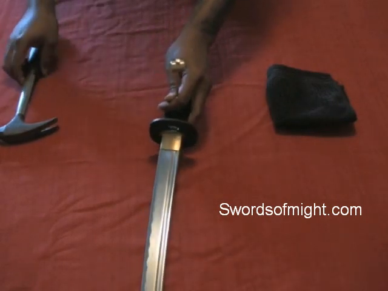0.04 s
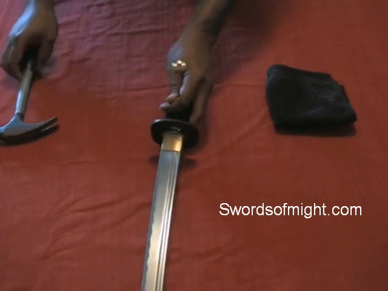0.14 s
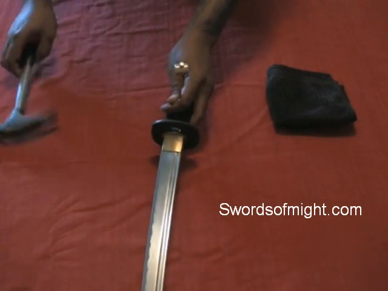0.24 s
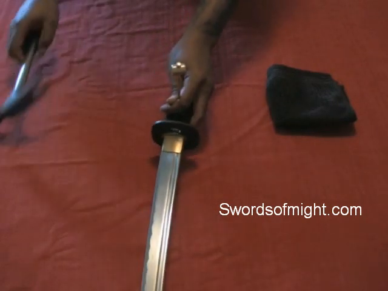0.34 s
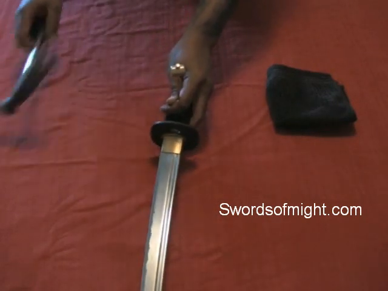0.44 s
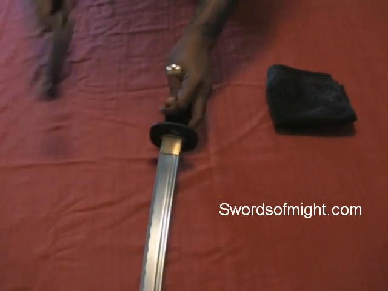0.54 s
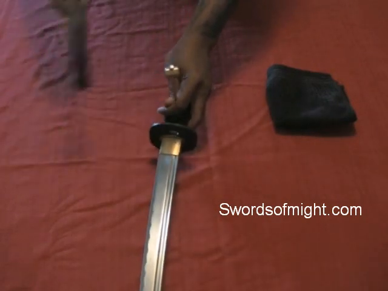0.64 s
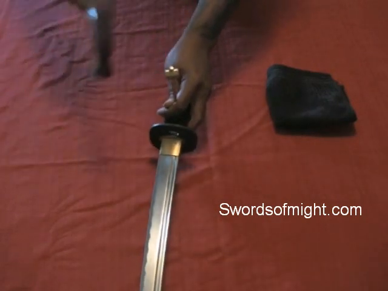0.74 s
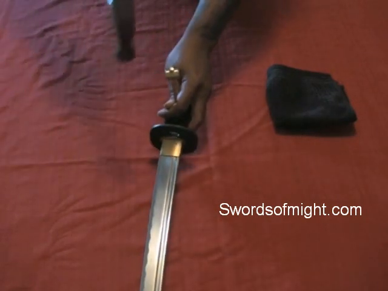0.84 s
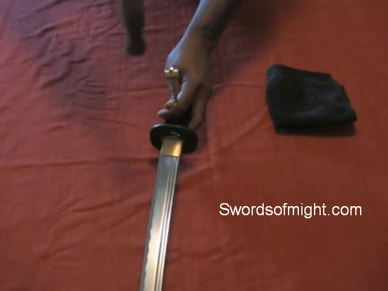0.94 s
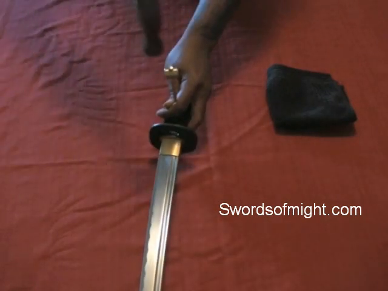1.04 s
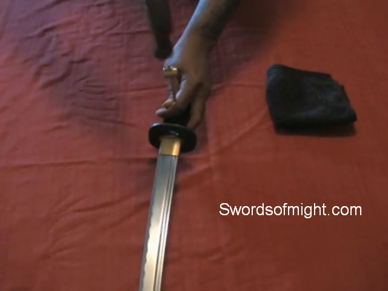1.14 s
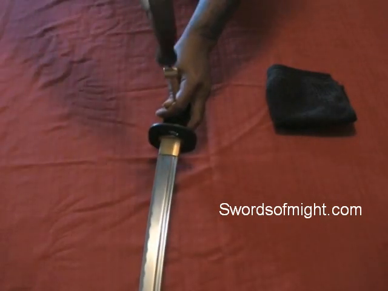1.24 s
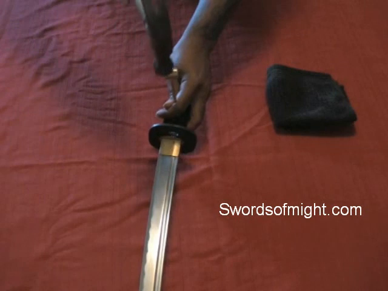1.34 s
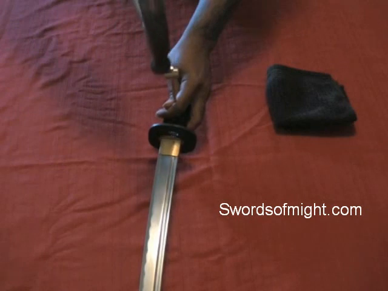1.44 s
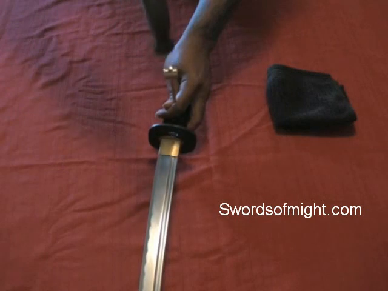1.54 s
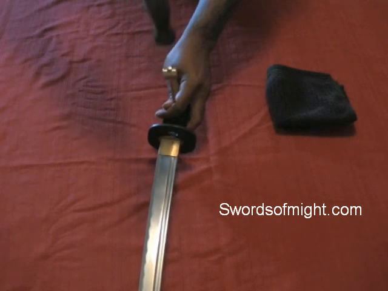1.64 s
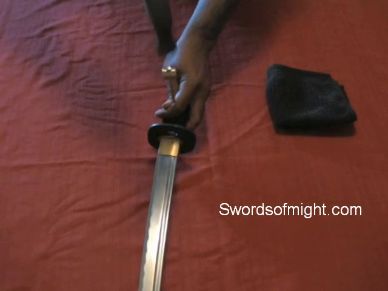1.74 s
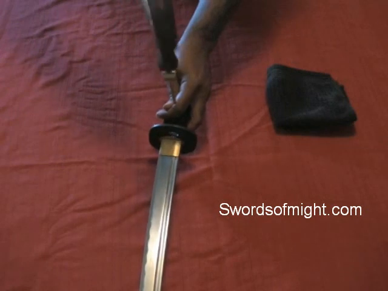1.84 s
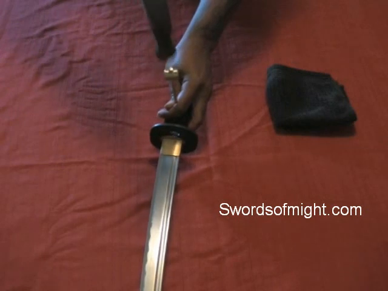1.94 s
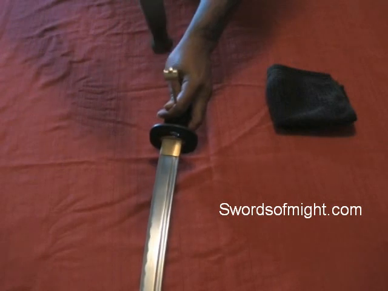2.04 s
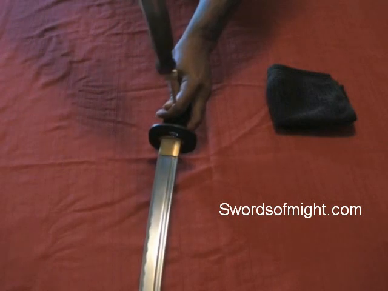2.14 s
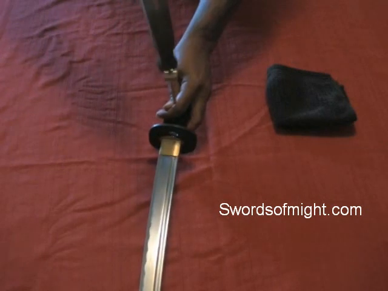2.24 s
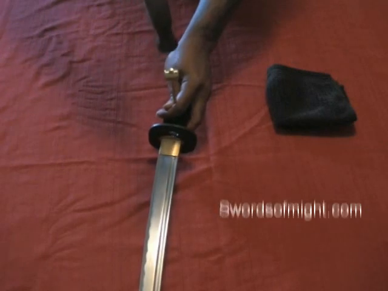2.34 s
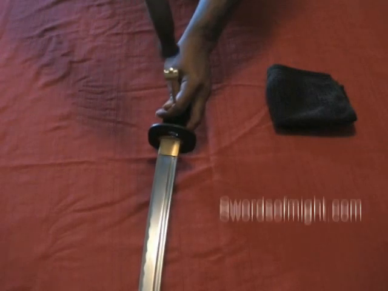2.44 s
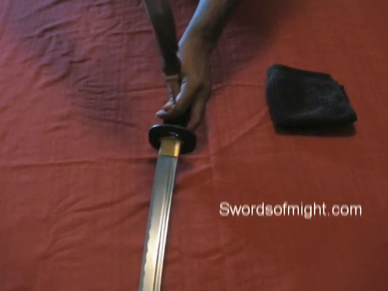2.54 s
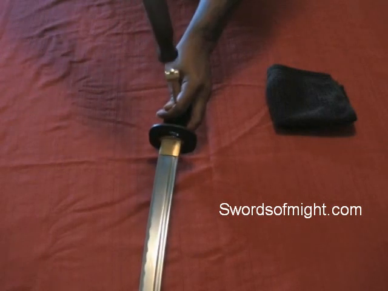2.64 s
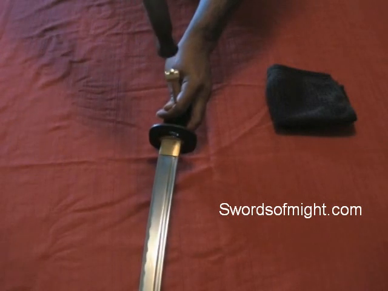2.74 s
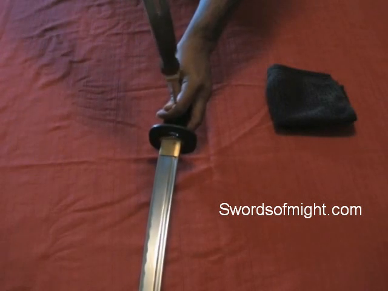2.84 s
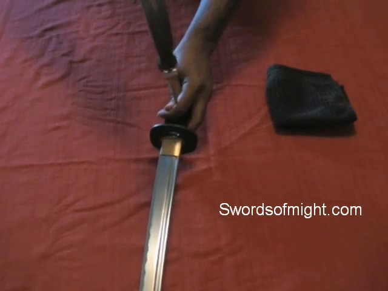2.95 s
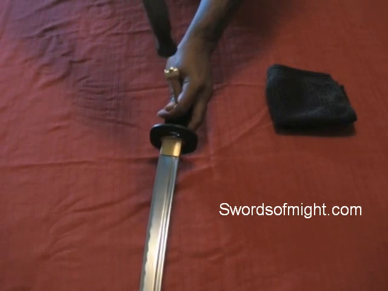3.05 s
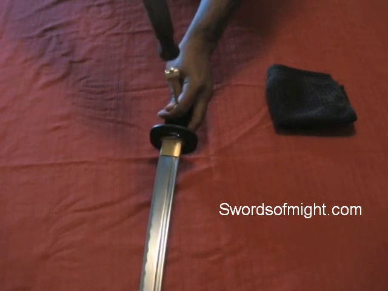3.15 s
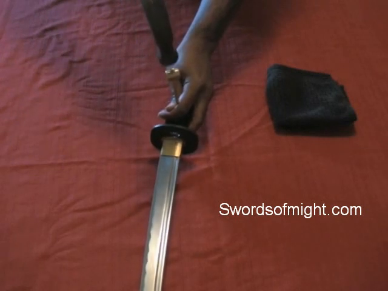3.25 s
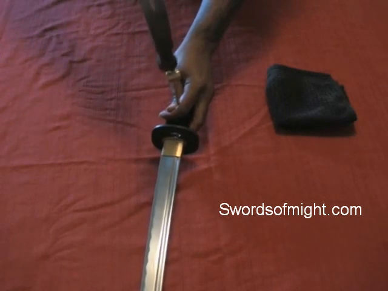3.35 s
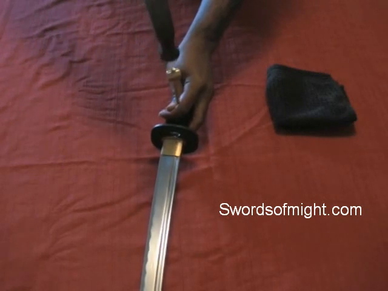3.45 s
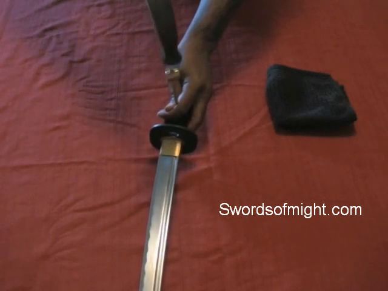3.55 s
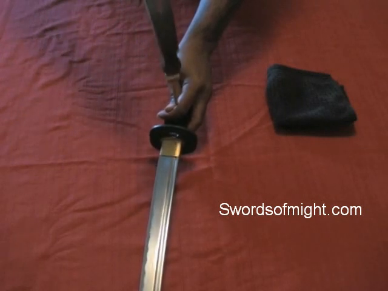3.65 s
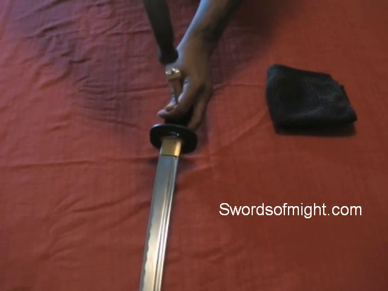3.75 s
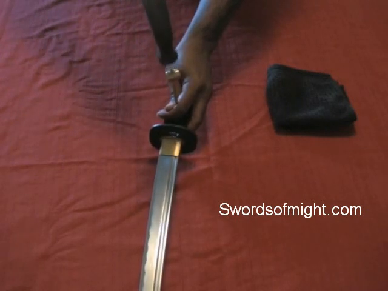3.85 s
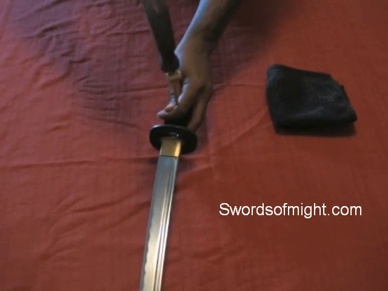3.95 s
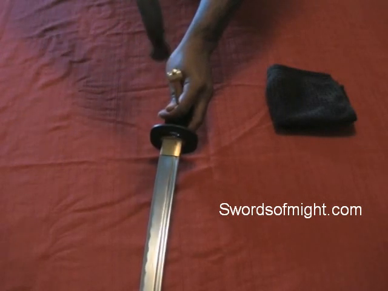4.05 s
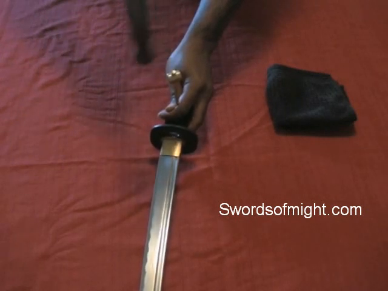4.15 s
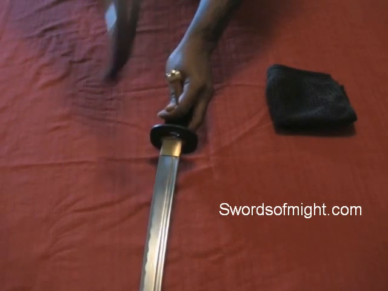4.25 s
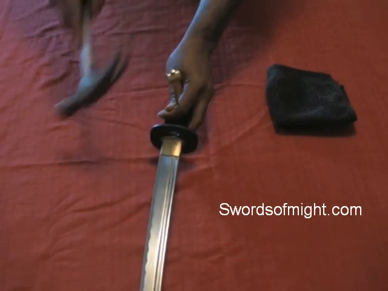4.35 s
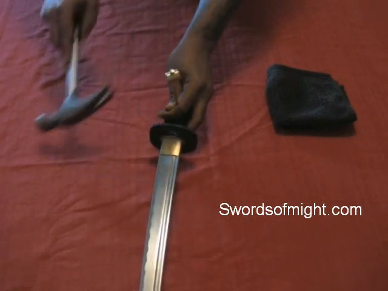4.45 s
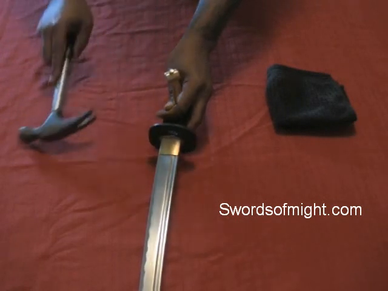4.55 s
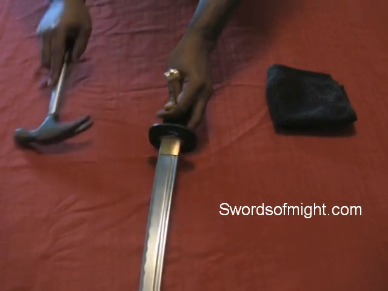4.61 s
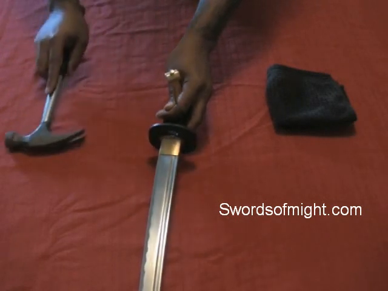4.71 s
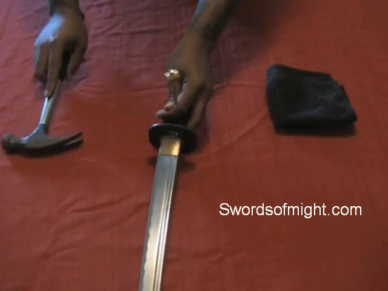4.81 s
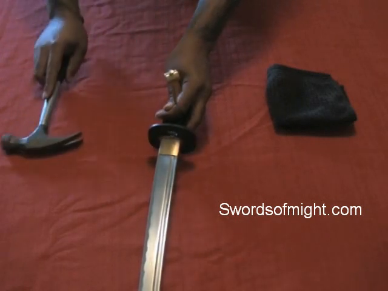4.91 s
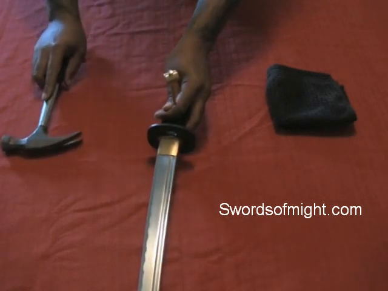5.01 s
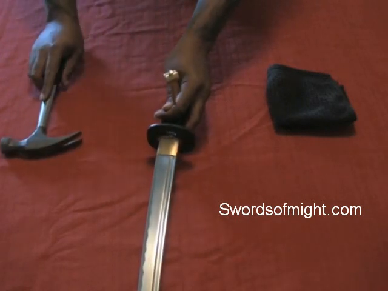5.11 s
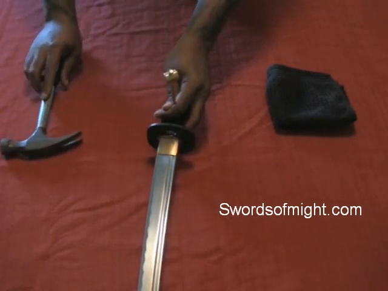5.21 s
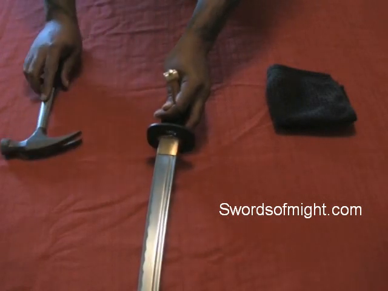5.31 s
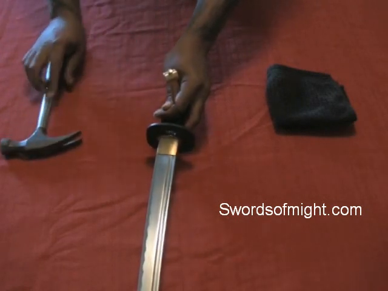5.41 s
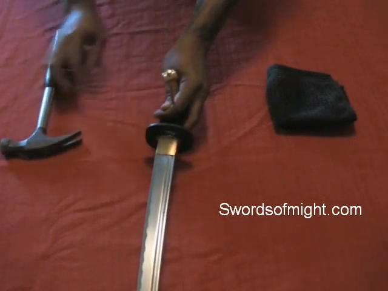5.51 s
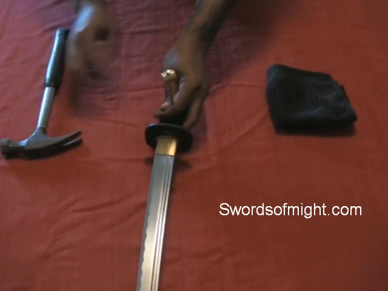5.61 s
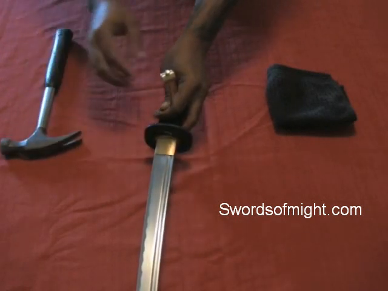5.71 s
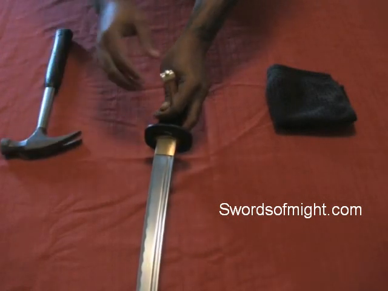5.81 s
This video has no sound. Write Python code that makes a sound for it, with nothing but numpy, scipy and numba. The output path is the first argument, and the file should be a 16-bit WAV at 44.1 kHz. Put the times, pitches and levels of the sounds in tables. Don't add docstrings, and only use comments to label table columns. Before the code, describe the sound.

Faint clink, then a run of hard, bright hammer cracks with woody table thumps and room echo, ending in soft padded thuds over hiss.

```python
import sys
import numpy as np
from scipy import signal
from scipy.fft import rfft, irfft
from scipy.io import wavfile
from scipy.ndimage import uniform_filter1d
from numba import njit

SR = 44100
rng = np.random.default_rng(int(sys.argv[2]) if len(sys.argv) > 2 else 0)


def wrap_up_sound(samples):
    columns = np.atleast_2d(samples).T
    tamed = np.clip(columns, -1, 1)
    steps = np.round(tamed * 32767).astype(np.int16)
    wavfile.write(sys.argv[1], SR, steps)


def gain_from_db(level_db):
    decades = np.asarray(level_db, float) / 20
    return 10 ** decades


N = 259040
TIME = np.arange(N) / SR

# [t/s, peak level/dB, tilt/dB per octave, push/ms, detour off the cloth/cm]
BLOWS = [
    (0.271, -21.5, 1.6, 0.12, 3.1),
    (1.3424, -6, .8, .345, 9.3),
    (1.8514, 6, 0.1, .21, 16),
    (2.2099, -1, -2.16, 0.14, 25),
    (2.5618, 0, -0.6, 0.15, 23.6),
    (2.9043, -1, -1.9, 0.14, 15),
    (3.3426, -3, -6.5, 0.13, 39),
    (3.6599, -3, -3.1, 0.13, 20.5),
    (3.9532, -4.5, -0.4, 0.16, 11.9),
]
# [f/Hz, level/dB, t60/s]
BOARD_MODES = [(71, -21, 0.5), (105.5, -28.5, 1), (132.3, -19.5, 0.39), (176.7, -5, 0.22), (200, -12, 0.25),
               (209.5, -16.5, 0.15), (249.9, -2, 0.29), (280.5, -5.5, 0.59), (340, -3, 0.16),
               (374, 5, 0.52), (385.2, 6.5, 0.2), (399, 14.5, 0.12), (445, -6.5, .5), (488, -6, 0.66),
               (535, -14, 0.7), (570, -22, 0.82), (606, 7, 0.42), (630, -16, 1), (686, 3, 0.53),
               (643, 1, 0.3), (743, -2.5, 0.52), (785, -7, 1), (840, -3.5, 0.68), (866, -8.5, 1),
               (941, -5.5, 1), (960, -10, 0.82), (1003, -5, 0.41), (1060, -9, 0.52), (1210, -12, 0.95),
               (1243, -18, 1)]


def unit(x):
    return x / np.max(np.abs(x))


def band(x, lo_hz, hi_hz, order=2):
    return signal.sosfilt(signal.butter(order, [lo_hz, hi_hz], "band", fs=SR, output="sos"), x)


def add(track, start_s, x):
    i = int(start_s * SR)
    track[i:i + len(x)] += x[:N - i]


def modes(mode_table, length_s, phase, extra_db=0, beat=0):
    hz, db, t60_s = np.transpose(mode_table)[:, :, None]
    t = TIME[:int(length_s * SR)]
    rate, start = rng.random((2, 2, len(mode_table), 1))
    spread_hz = 36 * (rate - 0.5)
    neighbours = 1 + beat * np.sum(np.exp(2j * np.pi * (spread_hz * t + start)), axis=0)
    swing = np.imag(neighbours * np.exp(1j * (2 * np.pi * hz * t + phase)))
    return np.sum(gain_from_db(db + extra_db - 60 * t / t60_s) * swing, axis=0)


def camcorder_noise():
    # [f/Hz, level/dB per Hz]
    hiss_spectrum = [(26, -45), (45, -7), (55, -11.5), (88, -17), (225, -3.5), (355, -1), (391, -10.5),
                     (441, -0.5), (485, -6), (973, -8), (1150, -12), (4640, -26), (11800, -34.5),
                     (13000, -32.5), (14000, -81)]
    # [t/s, level/dB]
    hiss_gain = [(0, -46), (1.3, -47), (2.0, -48), (4.2, -47.5), (5.87, -48.5)]
    # [f/Hz, level/dB]
    whine_tones = [(26, -62), (30, -67), (985, -68), (3898, -82), (4194, -79), (4495, -75), (4797, -82),
                   (5394, -81), (5819, -81), (5992, -80), (6293, -82)]
    hz, db = np.transpose(hiss_spectrum)
    f = np.maximum(np.fft.rfftfreq(N, 1 / SR), 1)
    noise = irfft(rfft(rng.standard_normal(N)) * gain_from_db(np.interp(np.log(f), np.log(hz), db)), N)
    noise = noise / np.std(noise) * gain_from_db(np.interp(TIME, *np.transpose(hiss_gain)) - 3.5)
    drift_rad = np.cumsum(rng.standard_normal(N)) * 0.006
    for k, (tone_hz, tone_db) in enumerate(whine_tones):
        phase = k + drift_rad * min(k, 1)
        noise = noise + np.sqrt(2) * gain_from_db(tone_db) * np.sin(2 * np.pi * tone_hz * TIME + phase)
    return noise


def push_db(f, push_ms, fill):
    x = f * push_ms / 1000 + 1e-4
    lobes = np.sinc(x) / (1 - x ** 2)
    return 10 * np.log10(lobes ** 2 + (fill / (1 + np.pi * x ** 3)) ** 2)


def crack_colour(blow_db, tilt_db, push_ms, detour_cm, head_share, cloth_share):
    # [f/Hz, width/Hz, level/dB]
    steel_modes = [(2210, 730, 3), (4590, 350, 3.5), (6900, 215, -3), (6940, 100, 2), (10100, 1420, 11.5),
                   (13500, 1400, -0.5)]
    # [f/Hz, level/dB per octave band]
    instant_blow = [(1600, -8.5), (2700, -7), (4400, 0), (7000, 5.5), (11000, 7.5), (13500, 20)]
    f = np.maximum(np.fft.rfftfreq(1024, 1 / SR), 1)
    hz, db = np.transpose(instant_blow)
    pivot_hz = 4400
    db = db + tilt_db * np.log2(hz / pivot_hz) - 10 * np.log10(hz)
    db = np.interp(np.log(f), np.log(hz), db)
    null_fill = 0.4 * gain_from_db(0.7 * blow_db)
    db = db + push_db(f, push_ms, null_fill)
    db = db + head_share * sum(d * np.exp(-((f - mode_hz) / w) ** 2) for mode_hz, w, d in steel_modes)
    off_cloth = np.clip(cloth_share, -0.8, 0.8) * np.exp(2j * np.pi * f * detour_cm / 34300)
    db = db + 20 * np.log10(np.abs(1 + off_cloth))
    db = db - 24 * np.log2(np.maximum(1450 / f, 1)) - 55 * np.log2(np.maximum(f / 14800, 1))
    cepstrum = irfft(db * np.log(10) / 20)
    cepstrum[1:512] *= 2
    cepstrum[513:] = 0
    return irfft(np.exp(rfft(cepstrum)))


def even_rattle(t, contact_s, bounce_s, bounce_db):
    age = t / contact_s
    burst = rng.standard_normal(len(t)) * age ** 0.7 * np.exp(-1.6 * age ** 1.6)
    burst = burst + gain_from_db(bounce_db) * np.roll(burst, int(bounce_s * SR))
    spectrum = rfft(np.roll(burst, int(0.002 * SR)))
    return irfft(spectrum / np.sqrt(uniform_filter1d(np.abs(spectrum) ** 2, size=13)))


def hammer():
    landings = [(0.36, 0.72), (0.8, 0.3), (0.55, 0.035), (0.43, 0.26), (0.63, 0.28), (0.49, 0.075),
                (0.72, 0.39), (0.6, 0.05), (0.6, 0.15)]
    # [delay/s, level/dB]
    bounces = [(.0015, -14), (.0013, 2.5), (.0092, -15), (.0018, -5), (.0016, -4), (.002, -6), (.0021, 3),
               (.0021, -1.5), (.0044, -2.5)]
    claw_levels = [-70, -64, -46, -45, -45, -35, -30, -46, -40]
    # [f/Hz, level/dB, t60/s]
    claw_modes = [(4480, -14, .5), (6212, -4, .45), (6245, 0, .48), (7340, -16, .4)]
    # [f/Hz, level/dB re blow, t60/s]
    punch_modes = [(4610, -21, .06), (7300, -29, 0.029), (2370, -25.5, 0.035)]
    near, far, ring = np.zeros((3, N))
    for blow, landing, bounce, claw_db in zip(BLOWS, landings, bounces, claw_levels):
        s, db, tilt_db, *contact = blow
        to_walls = crack_colour(db, tilt_db, *contact, *landing)
        to_camera = crack_colour(db, tilt_db + 1, *contact, *landing)
        contact_s = 0.0017 * gain_from_db(0.48 * db)
        rattle = even_rattle(TIME[:1024], contact_s, *bounce)
        crack = gain_from_db(db + 1.0) * unit(np.convolve(rattle, to_camera))
        same_energy = np.sqrt(np.sum(crack ** 2) / np.sum(to_walls ** 2))
        add(near, s - 0.002, crack)
        add(far, s, gain_from_db(-4) * to_walls * same_energy)
        claw_phase = 2 * np.pi * rng.random((len(claw_modes), 1))
        add(ring, s, gain_from_db(claw_db) * modes(claw_modes, 0.8, claw_phase, beat=0.4))
        add(ring, s, gain_from_db(db) * landing[0] * modes(punch_modes, 0.1, 0))
    return near, far, ring


def board(extra_db=0):
    chance = rng.random((len(BOARD_MODES), 2))
    damped = np.minimum(BOARD_MODES, [SR, SR, 0.48])
    return modes(damped, 0.5, 2 * np.pi * chance[:, :1], extra_db + 3 * (chance[:, 1:] - 0.5), beat=0.6)


def table():
    # [peak level/dB, then relative level/dB: < 320 Hz, > 520 Hz, > 800 Hz]
    thumps = [(-12, 7.5, -0.5, 1), (-7.5, 1.5, -6, 4), (-7.5, 3.5, 0.5, 1), (-8.5, 5.5, -0.5, 6),
              (-12, 4.2, -6, 6.5), (-10.5, 0.5, -6, 6), (-17, 0, -5, -1), (-30.5, 17, 5, 8.5)]
    near, far = np.zeros((2, N))
    hz = np.array(BOARD_MODES)[:, :1]
    lag_s, knock_db = 0.00654, -0.5
    for (s, *_), (db, low_db, upper_db, top_db) in zip(BLOWS[1:], thumps):
        ring = board((hz < 320) * low_db + (hz > 520) * upper_db + (hz > 800) * top_db)
        t = TIME[:len(ring)]
        ring = gain_from_db(db) * unit(ring * np.clip(t / 0.004, 0, 1))
        knock = ring * gain_from_db(-60 * t / 0.062)
        add(near, s + lag_s, gain_from_db(knock_db) * knock + ring * np.clip(t / 0.021, 0, 1))
        add(far, s + lag_s, knock)
    return near, far


def laying_down():
    # [t/s, peak level/dB, thud f/Hz, thud length/s, board level/dB]
    touches = [
        (4.8088, -22, 264, 0.00075, -9),
        (4.8156, -23, 200, 0.0014, -5.5),
        (5.3968, -12, 254, 0.00163, -11.5),
    ]
    near, far = np.zeros((2, N))
    t = TIME[:1024] - 0.01
    for s, db, hz, length_s, board_db in touches:
        spread_s = length_s * np.where(t > 0, 1.6, 1)
        thud = -gain_from_db(db) * np.cos(2 * np.pi * hz * t) * np.exp(-0.5 * (t / spread_s) ** 2)
        tick_shape = np.exp(-0.5 * ((t + length_s / 2) / 0.0014) ** 2)
        tick = gain_from_db(db - 31) * rng.standard_normal(len(t)) * tick_shape
        hard_core = gain_from_db(db - 2.5) * np.exp(-0.5 * (t / 0.00038) ** 2)
        push = thud + hard_core
        softer_top_db = (np.array(BOARD_MODES)[:, :1] > 330) * -6
        build_up = np.clip(TIME[:SR // 2] / 0.012, 0, 1)
        ring = signal.fftconvolve(push, board(softer_top_db) * build_up)
        add(near, s - 0.01, thud + band(tick, 900, 4900, order=4))
        add(near, s - 0.01, gain_from_db(db + board_db) * unit(ring))
        add(far, s - 0.01, push)
    return near, far


def room_answer(first_s, build_s):
    # [f/Hz, t60/s]
    room_decay = [(100, 0.48), (400, 0.59), (1500, 0.47), (4500, 0.58), (8000, 0.44), (15000, 0.34)]
    t, out = TIME[:SR], 0
    hz, t60_s = np.transpose(room_decay)
    for f in 70 * 2 ** np.arange(0, 8.1, 0.5):
        fade = gain_from_db(-60 * t / np.interp(np.log(f), np.log(hz), t60_s))
        out = out + band(rng.standard_normal(SR), f / 2 ** 0.25, f * 2 ** 0.25) * fade
    out = out * np.clip((t - first_s) / build_s, 0, 1)
    return out / np.sqrt(np.sum(out ** 2))


def echo(x):
    return signal.fftconvolve(x, room_answer(0.0017, 0.0068))[:N]


def scene():
    noise = camcorder_noise()
    tap, tap_far, ring = hammer()
    thump, thump_far = table()
    thud, thud_far = laying_down()
    tap_echo = band(echo(tap_far), 200, 13900, order=16)
    room = gain_from_db(-2.5) * tap_echo + gain_from_db(1.5) * echo(thump_far) + gain_from_db(-1.5) * echo(thud_far)
    mid = tap + ring + thump + thud + room + noise
    capsule_hiss = gain_from_db(-73) * band(rng.standard_normal(N), 6200, 13000, order=10)
    capsule_rumble = gain_from_db(-64.5) * band(rng.standard_normal(N), 21.5, 120)
    side = gain_from_db(-19) * np.gradient(np.roll(tap, 9)) + gain_from_db(-35) * tap_echo + capsule_hiss + capsule_rumble
    return np.array([mid + side, mid - side])


@njit
def follow(x, attack, release):
    out, e = np.empty(len(x)), 0.
    for i in range(len(x)):
        e += (x[i] - e) * (attack if x[i] > e else release)
        out[i] = e
    return out


def low_pass(x):
    return signal.sosfilt(signal.butter(12, 16540, fs=SR, output="sos"), x)


def record(dry):
    attack_s, release_s, knee_db, drive = 0.00083, 0.06, -21, 1.3
    loudness = follow(np.abs(dry).max(axis=0), 1 / (attack_s * SR), 1 / (release_s * SR))
    gain = np.minimum(1, gain_from_db(knee_db) / (loudness + 1e-9)) ** 0.4
    rounded = np.tanh(drive * gain_from_db(3) * dry * gain) / np.tanh(drive)
    trimmed = band(rounded, 15, 15300, order=8)
    return low_pass(np.clip(trimmed, -1, 1))


dry = scene()
out = record(dry)
wrap_up_sound(out)
```